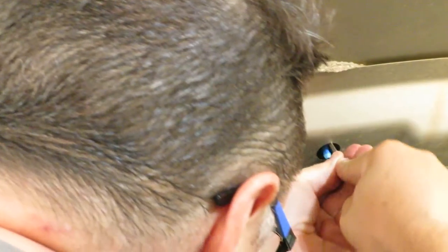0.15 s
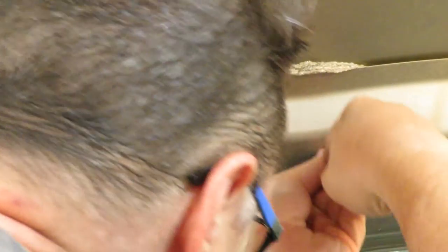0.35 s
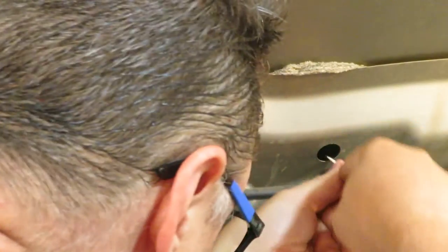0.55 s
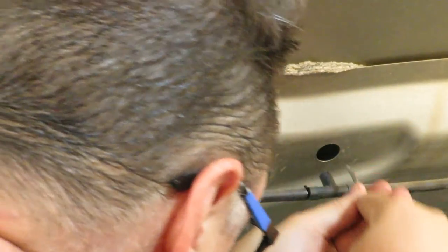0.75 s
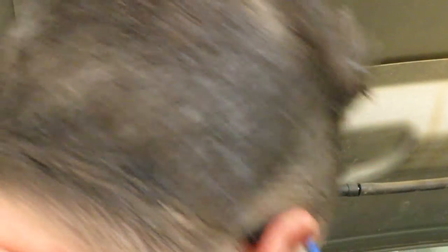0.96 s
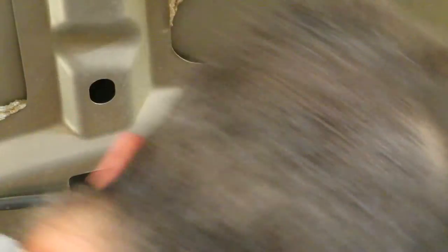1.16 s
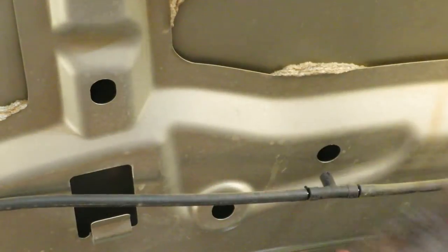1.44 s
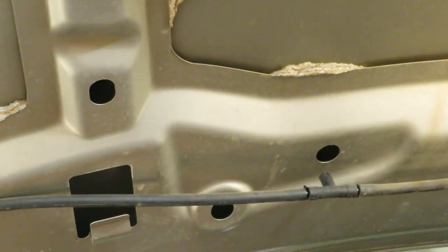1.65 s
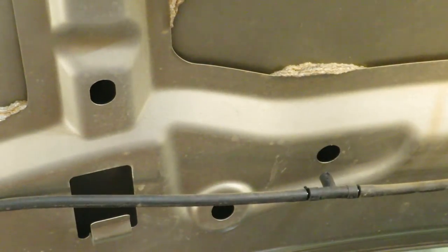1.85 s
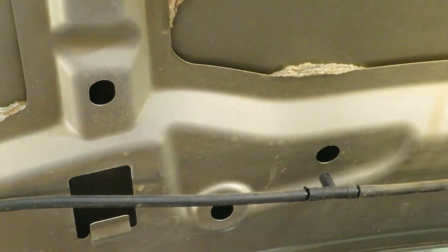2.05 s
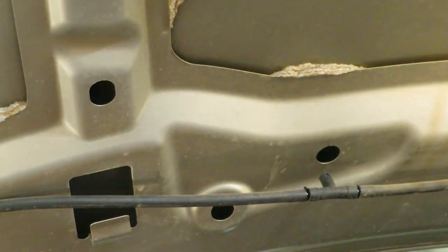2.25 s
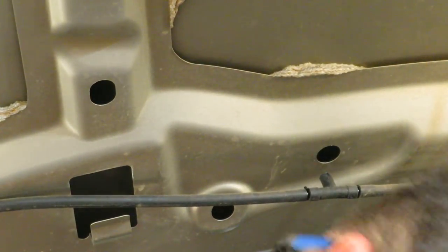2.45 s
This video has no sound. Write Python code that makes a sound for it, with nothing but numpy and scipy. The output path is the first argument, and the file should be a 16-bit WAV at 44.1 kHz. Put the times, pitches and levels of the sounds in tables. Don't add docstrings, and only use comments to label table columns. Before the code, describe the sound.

A loud plastic crack comes almost at once after faint finger touches, overloading the close microphone and echoing in a hard garage; then soft rubbing, hollow plastic knocks, tiny metallic ticks and dull floor thuds over hiss.

```python
import sys
import numpy as np
from scipy import signal
from scipy.io import wavfile

SR = 44100
rng = np.random.default_rng(int(sys.argv[2]) if len(sys.argv) > 2 else 0)


def persist_wave(psi):
    counts = np.round(np.clip(psi, -1, 1) * 32767).astype(np.int16)
    wavfile.write(sys.argv[1], SR, np.atleast_2d(counts).T)


def level_to_linear(level):
    exponent = np.asarray(level, float) / 20
    return 10 ** exponent


N = 114660
T = np.arange(N) / SR

# hz, likeness_0_to_1
AIR_LIKENESS = [(30, 0.69), (100, 0.71), (500, 0.49), (1500, 0.97), (4000, 0.53), (8000, .35), (14000, .1)]
# hz, likeness_0_to_1
CRACK_LIKENESS = [(30, .6), (100, 1), (700, 0.99), (1800, 1), (3500, .85), (8000, .55), (14000, 0.11)]


def rms_one(x):
    return x / np.sqrt(np.mean(x ** 2) + 1e-20)


def at_hz(points, hz):
    table_hz, value = np.array(points).T
    return np.interp(np.log(hz), np.log(table_hz), value)


def low_pass(x, order, top_hz):
    return signal.sosfilt(signal.butter(order, top_hz, fs=SR, output="sos"), x)


def band(x, low_hz, high_hz):
    sos = signal.butter(2, [low_hz, min(high_hz, SR * 0.45)], "band", fs=SR, output="sos")
    return signal.sosfilt(sos, x)


def ring(clicks, hz, t60_s):
    r = level_to_linear(-60 / (t60_s * SR))
    w = 2 * np.pi * hz / SR
    return signal.lfilter([0, np.sin(w)], [1, -2 * r * np.cos(w), r * r], clicks + 1e-18)


def burst(start_s, rise_s, hold_s, t60_s):
    t = T - start_s
    release_s = np.clip(t - rise_s - hold_s, 0, 3 * t60_s)
    return np.clip(t / rise_s, 0, 1) * level_to_linear(-60 * release_s / t60_s)


def noise(spectrum, likeness, size, dying=False):
    # hz, t60_s
    room_t60 = [(70, 0.98), (200, 0.57), (1000, 0.68), (4000, 0.71), (8000, 0.49), (14000, .42)]
    tail_rise_s = 0.0042
    edges_hz = 22 * 2 ** np.arange(0, 9.6, 0.5)
    t = np.arange(size) / SR
    white = rng.standard_normal((2, 2, size))
    out = 0
    for k, (low_hz, high_hz) in enumerate(zip(edges_hz, edges_hz[1:])):
        mid, side = band(white[k % 2], low_hz, high_hz)
        hz = np.sqrt(low_hz * high_hz)
        alike = np.clip(at_hz(likeness, hz), 0, 1)
        stereo = np.sqrt(1 + alike) * mid + np.sqrt(1 - alike) * side * [[1], [-1]]
        fade = 1
        if dying:
            fade = level_to_linear(-60 * t / at_hz(room_t60, hz)) * (1 - np.exp(-t / tail_rise_s))
        out = out + level_to_linear(at_hz(spectrum, hz)) * fade * stereo
    return rms_one(out)


def strike(hits, modes, contact_s):
    out = 0
    for k, (hz, mode_db, t60_s) in enumerate(modes):
        push = sum(level_to_linear(levels_db[k] + mode_db) * burst(start_s, 1 / SR, contact_s / 2.3, 7.3 * contact_s)
                   for start_s, levels_db in hits)
        contacts = push * rng.standard_normal(N) / np.sqrt(contact_s * SR)
        out = out + ring(contacts, hz, t60_s)
    return out


def crack():
    # hz, level_db_per_hz
    crack_spectrum = [(60, -30.5), (200, -13.5), (460, -0.5), (900, -6.5), (1740, -2), (3600, -7.5),
                      (5700, -26), (8000, -17)]
    # hz, level_db_per_hz
    room_spectrum = [(60, -33), (130, -8.5), (450, 0.5), (1050, -8.5), (2000, -7.5), (4000, -16.5),
                     (6500, -29.5), (14000, -32.5)]
    crack_s, tear_s, level_db, tear_db, tail_db = 0.2492, 0.004, 6.5, -16, -24.5
    tear = level_to_linear(tear_db) * burst(crack_s - tear_s, tear_s, 0.00072, 0.01)
    release = burst(crack_s, rise_s=0.00064, hold_s=0.0099, t60_s=0.034)
    direct = low_pass((tear + release) * noise(crack_spectrum, CRACK_LIKENESS, N), 3, 11500)
    start = int(crack_s * SR)
    tail = noise(room_spectrum, CRACK_LIKENESS, N - start, dying=True)
    tail = np.pad(tail, ((0, 0), (start, 0)))
    return level_to_linear(level_db) * (direct + level_to_linear(tail_db) * tail)


def knocks():
    # start_s, level_db, tilt_db_per_octave, favoured_hz
    knock_list = [
        (0.9184, -18.5, 14, 1727),
        (.972, -25.5, 21, 1982),
        (1.0855, -17.5, 4, 1102),
        (1.151, -23.5, 7, 2600),
        (2.155, -33, 7, 2239),
    ]
    # hz, level_db, t60_s
    part_modes = [(620, 2, .015), (1270, -3, .012), (1440, 0, .015), (2030, -2, .012), (2450, -5, .008),
                  (3120, -4, .01), (3700, -10, .006), (9500, -16, .002)]
    hz = np.array(part_modes)[:, 0]
    hits = [(start_s, level_db - tilt_db * np.abs(np.log2(hz / near_hz)))
            for start_s, level_db, tilt_db, near_hz in knock_list]
    return strike(hits, part_modes, contact_s=0.021)


def skin_grains():
    grains_per_s, low_hz, high_hz = 6000, (1600, 3960), (6500, 13600)
    grains = rms_one((rng.random(N) < grains_per_s / SR) * rng.standard_normal(N))
    low = rms_one(band(grains, *low_hz))
    high = rms_one(band(band(grains, *high_hz), *high_hz))
    return low, high


def rubs():
    # start_s, level_db, length_s, treble_share_db
    rub_list = [
        (.130, -56, 0.015, -2),
        (0.212, -44.5, 0.012, 2.5),
        (.235, -43, 0.019, 4),
        (0.412, -39.5, 0.036, 0.5),
        (0.606, -46, 0.011, -6),
        (.654, -43, 0.0073, -1.5),
        (0.68, -40, 0.028, -12),
        (0.752, -39, 0.035, -10),
        (0.818, -37.5, 0.025, -9),
        (1.002, -41, 0.013, -6),
    ]
    low, high = skin_grains()
    out = 0
    for start_s, level_db, length_s, treble_db in rub_list:
        shape = burst(start_s, 8 * length_s ** 2, length_s / 2, 6.7 * length_s)
        out = out + level_to_linear(level_db) * shape * (low + level_to_linear(treble_db) * high)
    return out


def sleeve():
    start_s, rise_s, level_db, treble_db = 0.5, 0.1, -37.5, -23.5
    cloth = rms_one(band(rng.standard_normal(N), 433, 2830))
    high = skin_grains()[1]
    body = burst(start_s, rise_s, hold_s=0.14, t60_s=0.24) * cloth
    treble = burst(start_s, rise_s, hold_s=0.18, t60_s=0.32) * high
    return level_to_linear(level_db) * (body + level_to_linear(treble_db) * treble)


def thuds():
    # start_s, level_db, pitch_hz
    thud_list = [(1.216, -32.5, 200), (1.276, -28.5, 393), (1.773, -29.5, 300), (1.816, -24, 190),
                 (2.15, -28, 160), (2.168, -27.5, 364), (2.182, -23, 231), (2.248, -29, 248),
                 (2.29, -34, 131), (2.42, -32, 125), (2.519, -30.5, 122)]
    return sum(strike([(start_s, [level_db, level_db])], [(hz, 0, 0.03), (1.55 * hz, -6, 0.025)], contact_s=0.012)
               for start_s, level_db, hz in thud_list)


def creak():
    centre_hz, half_width_hz, level_db = 968, 46, -54
    hum = band(rng.standard_normal(N), centre_hz - half_width_hz, centre_hz + half_width_hz)
    return level_to_linear(level_db) * burst(1.465, rise_s=0.025, hold_s=0.094, t60_s=0.34) * rms_one(hum)


def ticks():
    # start_s, level_db, low_ring_db
    tick_list = [
        (1.0022, -46, -10),
        (1.2546, -35.5, 7.5),
        (1.6757, -33.5, 12),
        (1.9341, -37, -6),
        (2.3716, -42, 1),
    ]
    # hz, level_db, t60_s
    metal_modes = [(2480, 0.5, 0.0019), (3350, -2, 0.0017), (4630, -3, .002), (5640, -2, .004),
                   (6253, 8, 0.0061), (7130, -7, .003), (12570, -6, 0.011)]
    edge_db = 7
    start_s, level_db, low_db = np.array(tick_list).T
    at = (start_s * SR).astype(int)
    out = 0
    for hz, mode_db, t60_s in metal_modes:
        clicks = np.zeros(N)
        clicks[at] = level_to_linear(level_db + mode_db + low_db * (hz < 5000)) * rng.choice([-1, 1])
        out = out + ring(clicks, hz, t60_s)
    edge = sum(level_to_linear(db + edge_db) * burst(s, 1 / SR, 0.0002, 0.003) for s, db, _ in tick_list)
    return out + band(edge * rng.standard_normal(N), 2600, 14500)


def air():
    # hz, level_db_per_hz
    air_spectrum = [(30, -13), (70, -8), (200, -12), (450, -12.5), (900, -15), (2200, -22), (6000, -33),
                    (14000, -43)]
    hiss_db, rumble_db, rumble_hz = -47.5, -47.5, (62, 135)
    hiss = low_pass(noise(air_spectrum, AIR_LIKENESS, N), 8, 13200)
    rumble = band(band(rng.standard_normal(2 * N), *rumble_hz), *rumble_hz)[N:]
    return level_to_linear(hiss_db) * hiss + level_to_linear(rumble_db) * rms_one(rumble)


def garage(x, likeness):
    size = SR // 2
    walls = noise([(100, -0.45), (1000, 1), (14000, -2.8)], likeness, size, dying=True) / np.sqrt(size)
    return signal.fftconvolve(x[None], walls, axes=1)[:, :N]


def heard(x, lag_us):
    return np.array([np.interp(T - lag_us / 1e6, T, x), x])


def scene():
    sources = [ticks(), knocks(), thuds() + creak(), rubs() + sleeve()]
    tick, knock, thud, rub = low_pass(sources, 6, 13500)
    tick_echo = 0.92 * np.interp(T - 0.0021, T, tick)
    near = heard(tick + tick_echo, lag_us=28) + heard(knock + thud + rub, lag_us=7.7)
    wet = garage(level_to_linear(1.5) * tick + level_to_linear(-5) * thud, AIR_LIKENESS)
    wet = wet + garage(level_to_linear(-8.5) * knock + level_to_linear(-6) * rub, CRACK_LIKENESS)
    return near + wet + crack() + air()


def top_cut(x):
    return signal.sosfilt(signal.butter(12, 15670, fs=SR, output="sos"), x)


def record(dry):
    duck_db, threshold_db, attack_s, hold_s, recover_db_per_s = 14, -10, 0.019, 0.95, 7
    top = 0.8
    loud = np.abs(dry).max(axis=0) > level_to_linear(threshold_db)
    since_s = T - np.maximum.accumulate(np.where(loud, T, -99))
    want_db = np.clip(duck_db - recover_db_per_s * np.maximum(since_s - hold_s, 0), 0, None)
    r = np.exp(-1 / (attack_s * SR))
    gain_db = -signal.lfilter([1 - r], [1, -r], want_db)
    x = dry * level_to_linear(gain_db) / top
    mix = top * x / (1 + np.abs(x) ** 9) ** (1 / 6)
    return top_cut(mix)


dry = scene()
out = record(dry)
persist_wave(out)
```